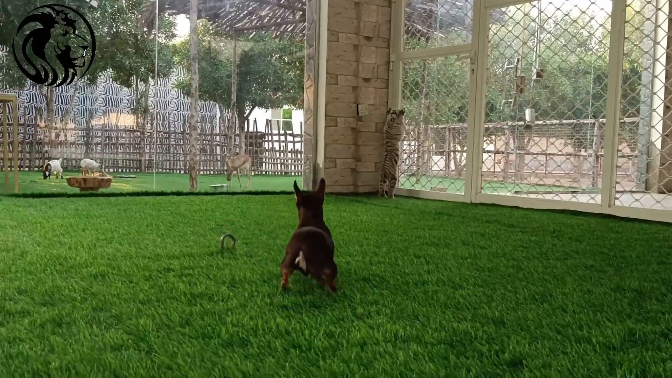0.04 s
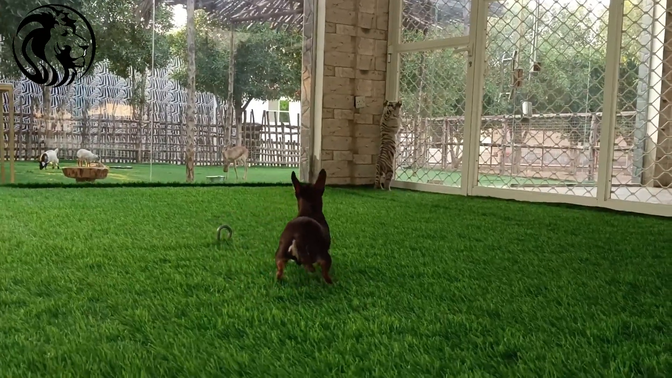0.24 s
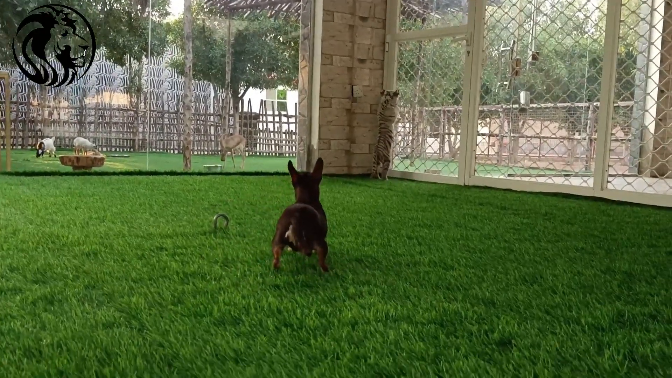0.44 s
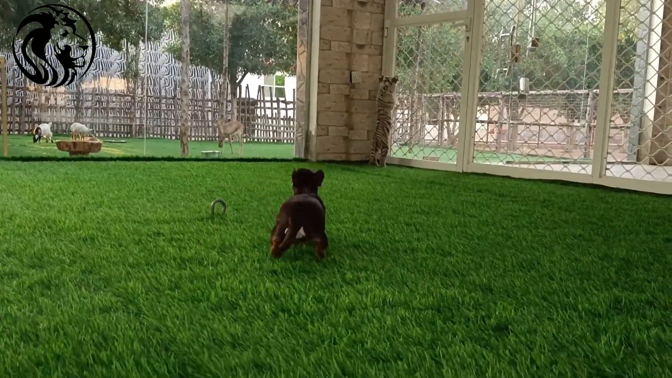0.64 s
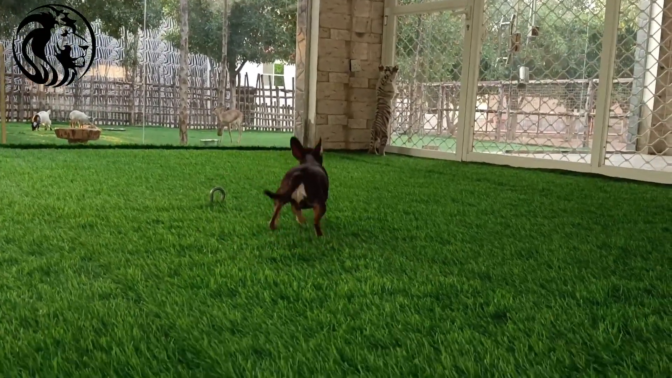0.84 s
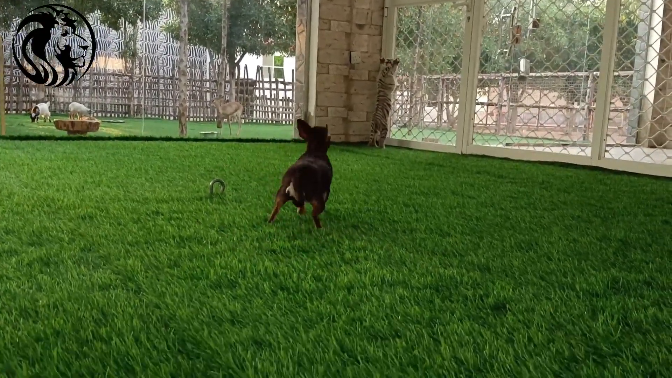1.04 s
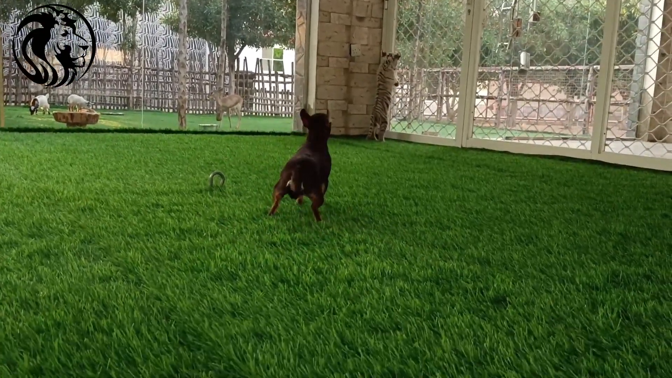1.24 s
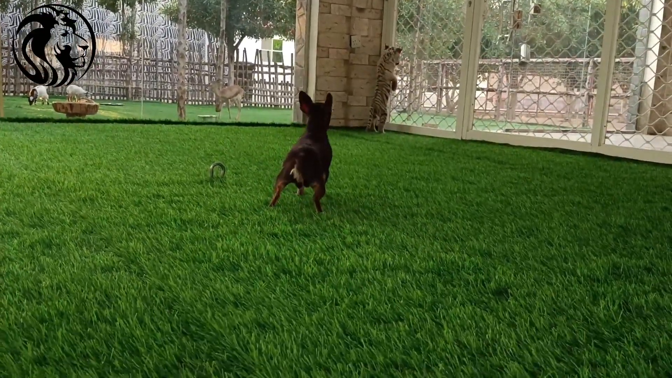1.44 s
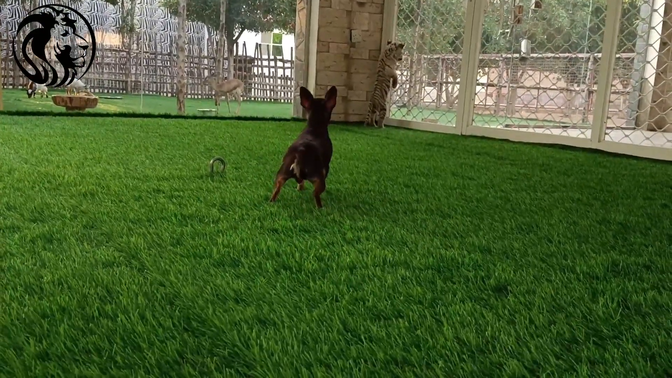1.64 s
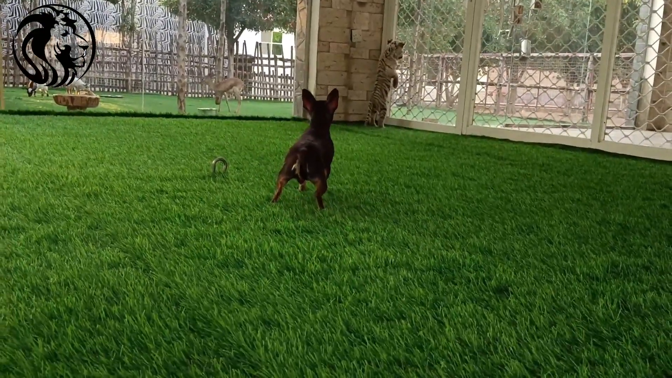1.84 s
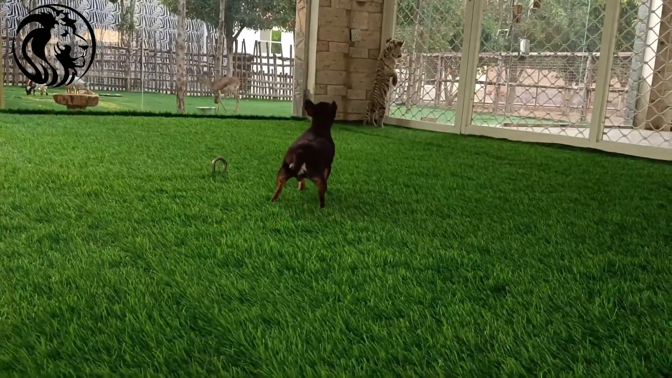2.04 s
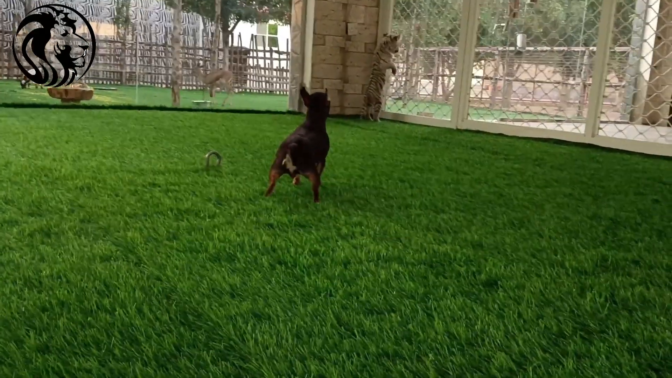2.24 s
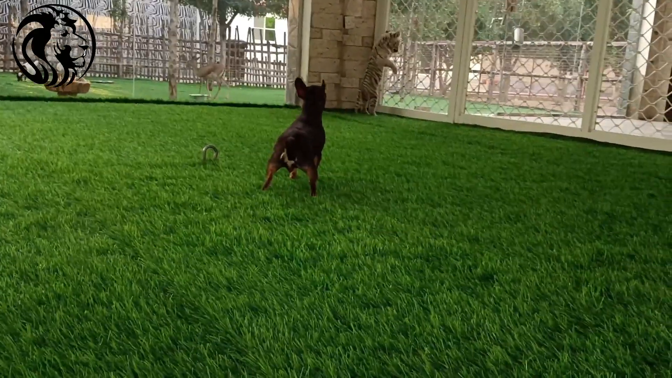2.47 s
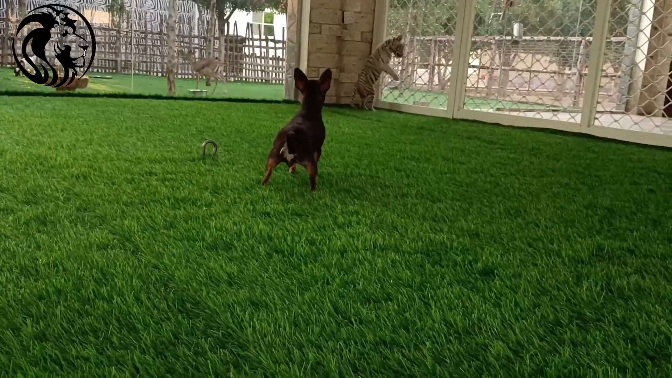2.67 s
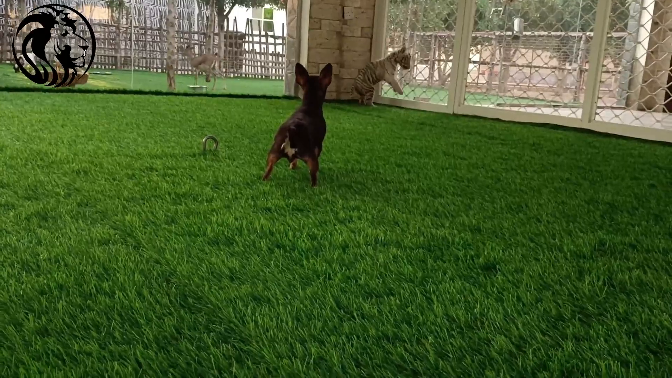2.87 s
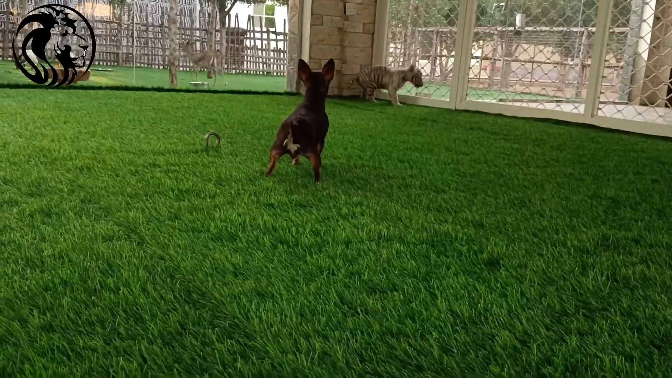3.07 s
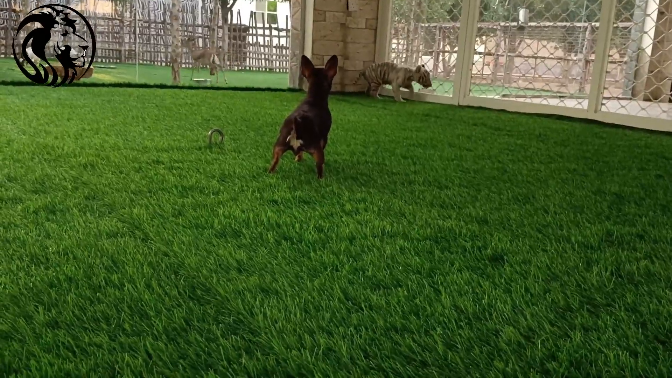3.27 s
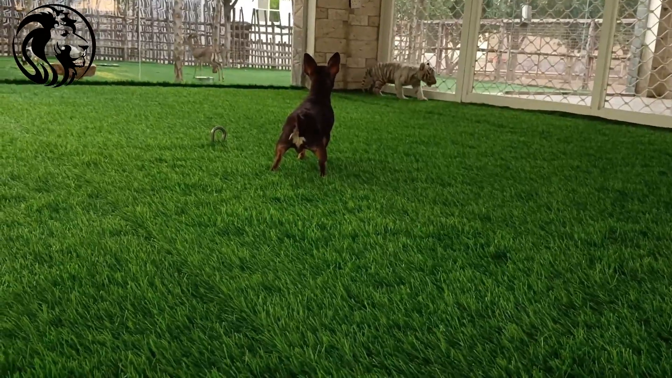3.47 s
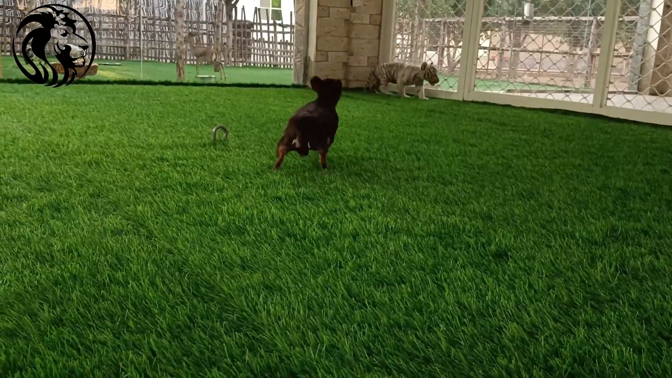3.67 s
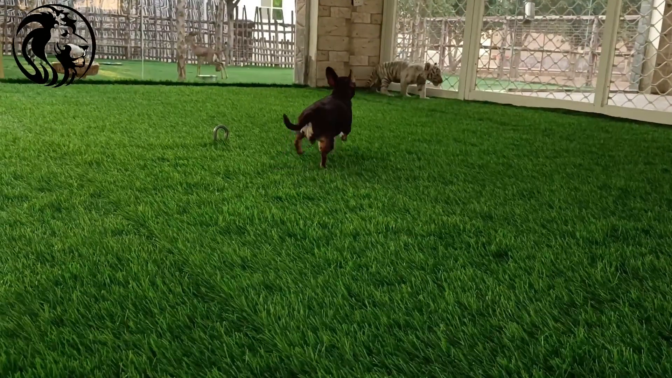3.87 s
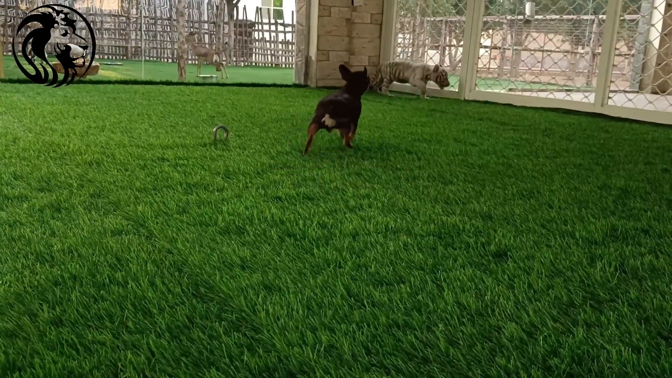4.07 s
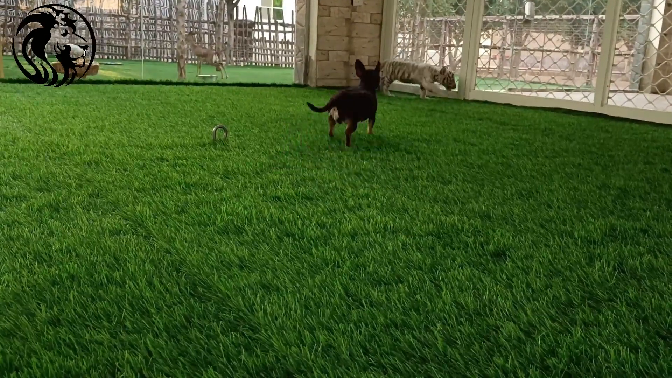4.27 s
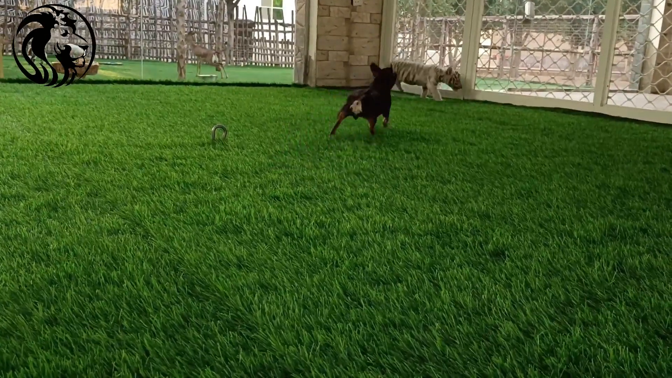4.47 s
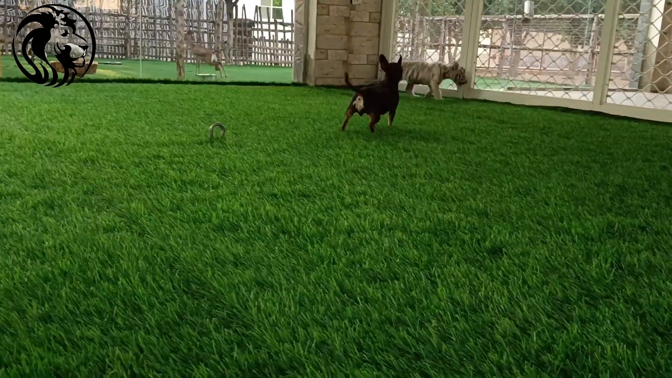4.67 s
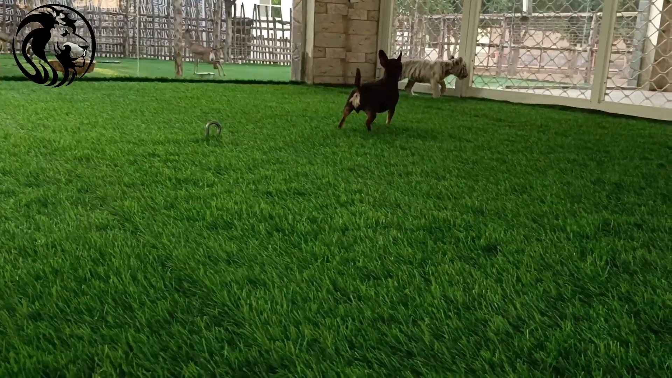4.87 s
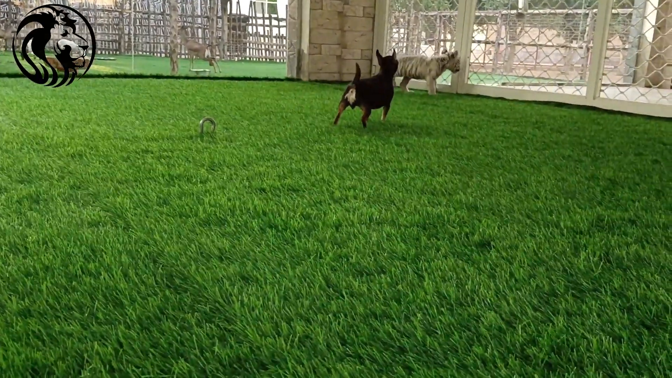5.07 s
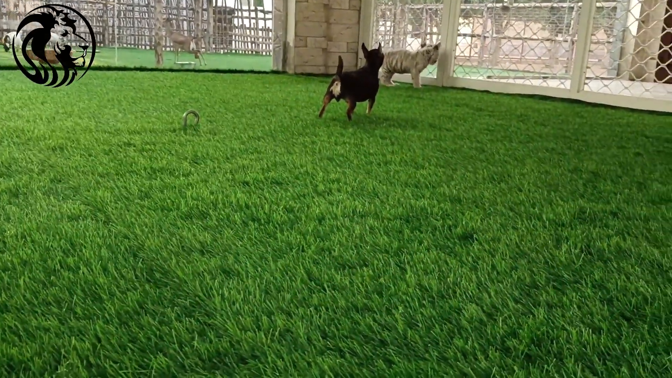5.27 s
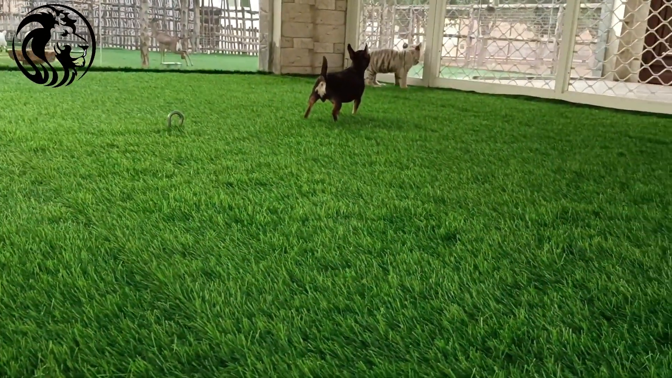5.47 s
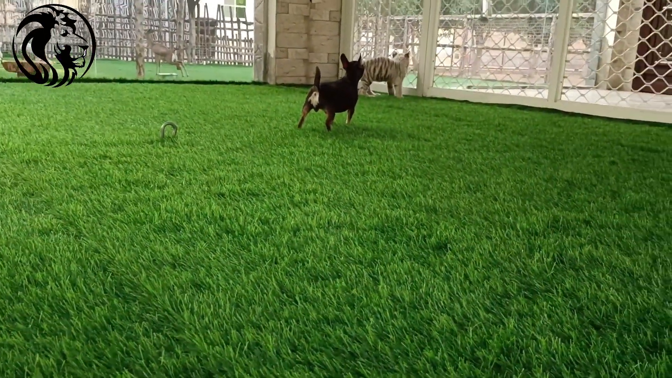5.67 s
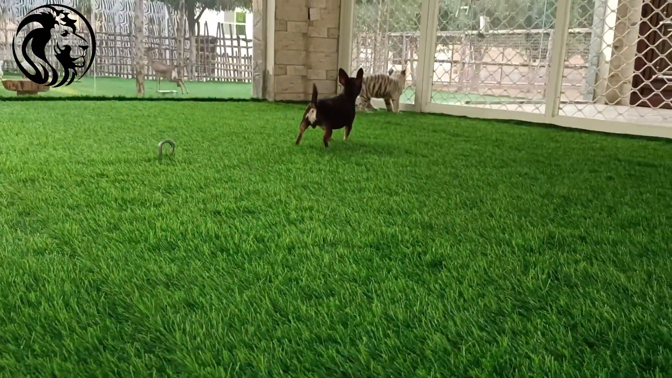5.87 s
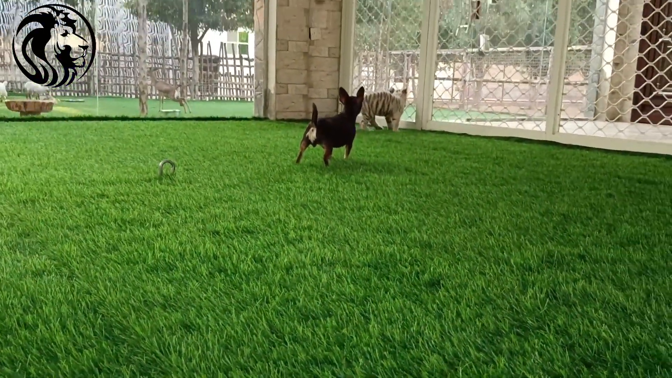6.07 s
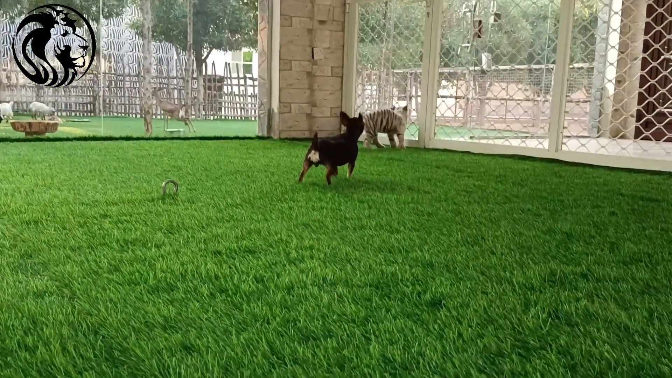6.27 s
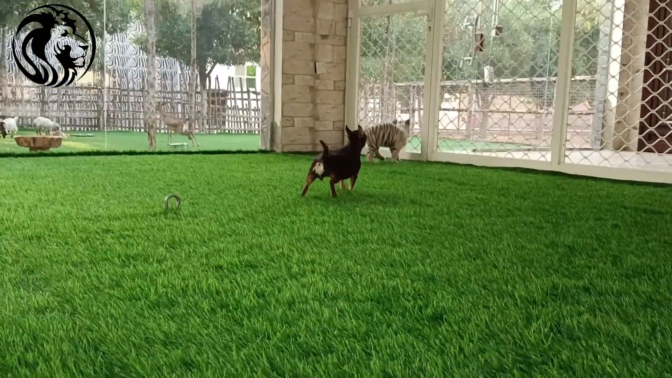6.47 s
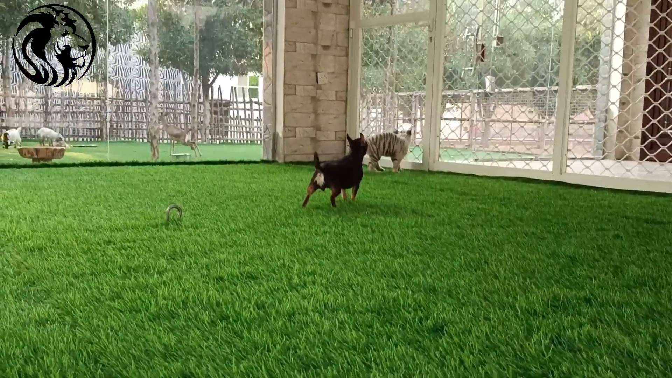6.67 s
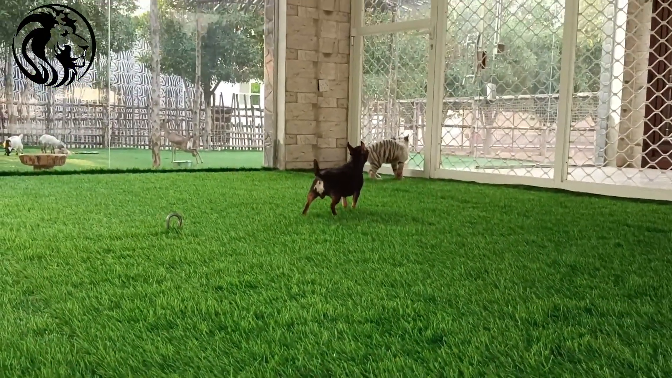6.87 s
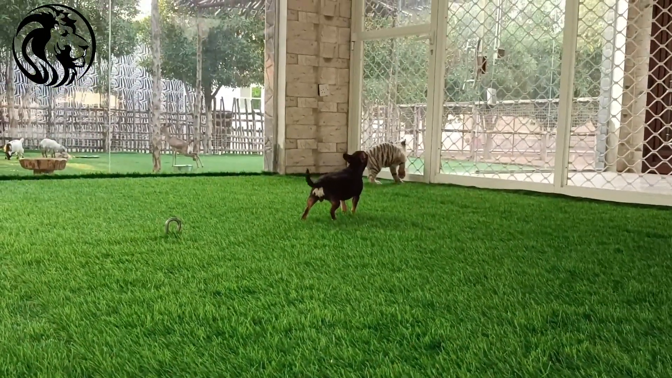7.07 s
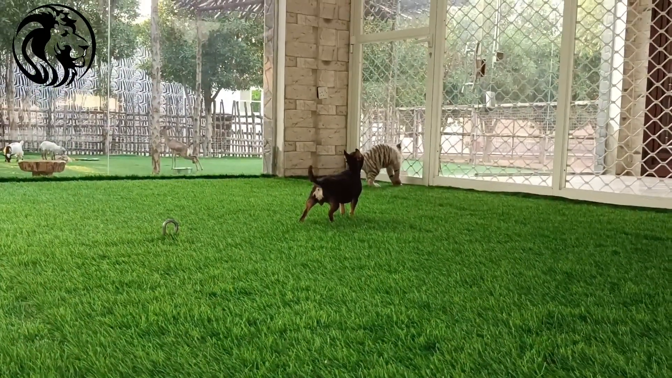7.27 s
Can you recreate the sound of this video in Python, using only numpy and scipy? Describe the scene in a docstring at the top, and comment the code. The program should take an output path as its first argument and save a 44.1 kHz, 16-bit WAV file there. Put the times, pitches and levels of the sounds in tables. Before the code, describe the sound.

Stereo pickup inside a large hard-walled enclosure with artificial grass. Ventilation rumbles softly, louder in the first second, with a faint low hum. Two light paw rustles come first, then loud, clipped, high puppy yaps in irregular groups with pauses, their echoes hanging in the room. A breathy low growl precedes the third yap. Thin distant chirps pass almost unnoticed, and a small flurry of turf scuffs comes before the last two yaps.

```python
"""A small puppy yaps eight times at a tiger cub, in a glass-walled hall laid with artificial turf, heard by a stereo pair.
Each yap is a low grunt from the chest and vocal-fold pulses with air, shaped by three throat resonances;
the tone opens as the jaw does, brightens with strain, then sags and roughens, and the hall rings for about a second.
Nearby, a soft growl and paws scuffing the turf (shaped noise); far off, thin chirps (falling sine tones).
Behind it all, ventilation: rumble and hiss of shaped noise, louder at first, and a hum of two wavering tones."""
import sys
import numpy as np
from scipy import signal
from scipy.fft import rfft, irfft, next_fast_len
from scipy.io import wavfile
from scipy.ndimage import uniform_filter1d, minimum_filter1d, map_coordinates

SR = 44100
rng = np.random.default_rng(int(sys.argv[2]) if len(sys.argv) > 2 else 0)


def dump(signal):
    """Clip the signal to [-1, 1] and save it as 16-bit WAV at the path in sys.argv[1]."""
    limited = np.clip(np.atleast_2d(signal).T, -1, 1)
    pcm = np.round(limited * 32767).astype(np.int16)
    wavfile.write(sys.argv[1], SR, pcm)


N = 322812
T = np.arange(N) / SR

# Ventilation rumble, also the colour of a paw's thud: [f/Hz, relative level per Hz/dB]
RUMBLE_SPECTRUM = [(12, -61), (20, -25), (46, -11), (88, -2), (107, 0), (172, -4.5), (198, 0.5),
                   (225, -5.5), (349, -18), (386, -22.5), (600, -32.5), (780, -58.5), (1320, -120)]
# Ventilation hiss: [f/Hz, relative level per Hz/dB]
HISS_SPECTRUM = [(200, -13.5), (400, -13), (700, -5), (1200, -10.5), (1900, -11), (3400, -11.5),
                 (4400, -23.5), (7000, -29.5), (10000, -35), (15000, -30)]
# Ventilation motor tones: [f/Hz, rms level before the microphones/dB]
HUM_TONES = [(99, -59.5), (200, -66.5)]
# Far-off chirps: [start t/s, length t/s, start f/Hz, end f/Hz, relative level before the hall/dB]
CHIRPS = [(2.891, .05, 4840, 4120, -74), (2.943, 0.16, 3110, 3031, -72), (5.576, 0.13, 4760, 3120, -77.5)]
# Paw steps: [t/s, relative level/dB, f/Hz towards which the rustle is shifted]
STEPS = [(0.1244, -54.5, 2130), (0.1883, -52, 1760), (2.9481, -60.5, 2920), (3.5198, -63, 3310),
         (3.5794, -59, 2365), (5.7276, -53, 3250), (5.8182, -45.5, 2310), (5.9795, -42, 3075),
         (6.24, -49.5, 2610)]
# Rustle of the plastic blades: [f/Hz, relative level per Hz/dB]
TURF_SPECTRUM = [(200, -35.5), (500, -19), (1100, -6.5), (1600, -9.5), (2400, 0), (3300, -5), (4200, -24),
                 (5600, -28), (9000, -44.5), (15000, -52.5)]
# Closed-mouth colour of the growl: [f/Hz, relative level/dB]
GROWL_COLOUR = [(60, -44), (130, -18.5), (205, 4), (320, -7.5), (420, -17), (600, -3), (900, -17.5),
                (1500, -28.5), (5000, -93.5)]
# Chest colour of the grunt under each yap: [f/Hz, relative level/dB]
CHEST_COLOUR = [(30, -54), (110, -21.5), (175, -11), (290, 5.5), (400, -4), (550, -2.5), (850, -3.5),
                (1300, -22), (2500, -53), (6000, -87)]
# Colour of the hissy voice between the teeth: [f/Hz, relative level/dB]
MUZZLE_COLOUR = [(500, -75), (1200, -7.5), (2000, -9.5), (2300, 1.5), (2600, -2.5), (3200, 0.5),
                 (3550, -9.5), (4200, -31.5), (5700, -21), (6500, -37), (7200, -35), (8600, -46.5),
                 (11500, -47.5), (13500, -31), (15500, -33.5)]
# Yaps: [start t/s, mouth opening t/s, rms level over the first 0.2 s before the microphones/dB, nominal pitch f/Hz,
# droop of the jaw/0-1, second resonance at full strain f/Hz, its relative level/dB, third resonance f/Hz,
# its relative level/dB, relative grunt level/dB, right minus left level before the microphones/dB]
YAPS = [ (.768, .022, -10.5, 526.8, .5, 1700, 1.5, 2844, -5, -15, -0.5),
        (1.171, .038, -13, 475.1, .7, 1565, -0.5, 3186, -8, -18.5, -0.5),
        (2.049, .046, -12.5, 481.7, .9, 1603, -1, 2680, -10.5, -18, 0),
        (3.745, .036, -12.5, 498.6, 0.4, 1726, 1.5, 3014, -4.5, -15.5, 0),
        (4.072, .046, -14.5, 479.5, .9, 1585, 1.5, 3105, -7, -15, -0.5),
        (4.458, .050, -13.5, 486, .85, 1551, -4, 2947, -12, -19.5, -0.5),
        (6.400, .040, -11.5, 513.7, .35, 1667, 0, 2906, -4, -17.5, -1),
        (7.123, .044, -14.5, 484, 0.4, 1583, 2, 2974, -4.5, -17.5, 0.5)]
# Ring of the hall: [f/Hz, t60/s]
HALL_RING = [(150, 1.5), (400, 1.435), (1000, 0.87), (2800, 0.94), (6000, .8), (9000, 1.1), (14000, 0.32)]
# Imbalance of the stereo pair: [f/Hz, level by which the right microphone is louder/dB]
MIC_BALANCE = [(100, 1), (400, 1), (900, 2), (1500, 4), (2800, 7.5), (5500, 3.5), (8000, 3.5), (13000, 7.5)]

RUMBLE_DB, HISS_DB = -57.5, -72.5  # settled background
EARLY_RUMBLE_DB, EARLY_HISS_DB, SETTLE_S = 9, 11, 1.1  # extra level at first, and how soon it settles
TURF_HZ = 2430  # centre of the turf's spectrum
GROWL_S, GROWL_LENGTH_S = 1.75, .3
YAP_S, RELEASE_DB_PER_S = .125, 1401.5  # each yap is one push of the chest, cut off this fast
ONSET_DB, SAG_DB = 35, 7  # the voice swells by this while the mouth opens, then sags as the air runs out
GRUNT_ONSET_DB, GRUNT_SAG_DB = 6, 10  # the same for the grunt, which is there almost at once
PITCH_RISE, PITCH_ARCH = 1.03, .34  # ratio to nominal pitch, jaw wide; share lost with the jaw shut
FIRST_RATIO, FIRST_ARCH = 2.198, .34  # the same for the first resonance, near the second harmonic
STRAIN_S, STRAIN_DB, SLACK_DB = .088, 1.5, -22  # time to full strain; gain of upper resonances, full and none
SECOND_GLIDE, SECOND_DROOP = .34, .07  # shares the second resonance loses: throat slack, jaw drooping
ROUGH, ROUGH_ONSET, ROUGH_END = 0.34, 3.6, 0.75  # share of air at the cleanest; added at start and at end
AIR_SAG_DB = 3.5  # the hiss between the teeth weakens by this much more than the voice
TOP_HZ = 15600  # band limit of the microphones' signal


def amp(db):
    """Decibels to gain."""
    return 10 ** (np.asarray(db) / 20)


def unit(x):
    """Scale to rms 1."""
    return x / np.sqrt(np.mean(x ** 2) + 1e-20)


def along(points, hz):
    """Read (f/Hz, value) points on a log frequency axis."""
    f, v = np.transpose(points)
    return np.interp(np.log(hz + 1), np.log(f), v)


def filtered(x, response):
    """Multiply the spectrum of x by a response of frequency."""
    n = x.shape[-1]
    m = next_fast_len(n + 8192)
    return irfft(rfft(x, m) * response(np.fft.rfftfreq(m, 1 / SR)), m)[..., :n]


def coloured(x, spectrum):
    """Shape x by a (f/Hz, level/dB) spectrum, at rms 1."""
    return unit(filtered(x, lambda hz: amp(along(spectrum, hz))))


def wobble(rate, n):
    """A smooth random curve of n samples, with rate knots a second."""
    knots = rng.standard_normal(int(n * rate / SR) + 4)
    at = np.arange(0, len(knots) - 1, 1 / 8)
    return np.interp(np.arange(n) * rate / SR, at, map_coordinates(knots, [at]))


def add(track, s, sound):
    """Mix a sound into the track at time s."""
    part = track[..., max(round(s * SR), 0):][..., :sound.shape[-1]]
    part += sound[..., :part.shape[-1]]


def diffuse(n, spacing_m=0.12):
    """Noise from all sides at two spaced microphones: alike in the bass, unrelated in the treble."""
    def rotation(hz):
        alike = 0.97 * np.sinc(2 * hz * spacing_m / 343)  # 343 m/s: speed of sound
        angle = np.arccos(np.clip(alike, -1, 1)) / 2
        return np.array([np.cos(angle), np.sin(angle)])

    mid, side = filtered(rng.standard_normal((2, n)), rotation)
    return np.array([mid + side, mid - side])


def ventilation(swell_db=-2.4, drift_rad=0.23):
    """Low rumble and faint hiss from all around, louder at first, and a slightly unsteady motor hum."""
    early = np.exp(-(T / SETTLE_S) ** 2)
    rumble_db = RUMBLE_DB + EARLY_RUMBLE_DB * early + swell_db * wobble(3.9, N)
    rumble = amp(rumble_db) * coloured(diffuse(N), RUMBLE_SPECTRUM)
    hiss = amp(HISS_DB + EARLY_HISS_DB * early) * coloured(diffuse(N), HISS_SPECTRUM)
    hum = np.zeros(N)
    for hz, db in HUM_TONES:
        phase = 2 * np.pi * hz * T + drift_rad * wobble(4, N)
        hum += amp(db) * unit(np.sin(phase))
    return rumble + hiss + hum


def hall(x, direct_db, early_db, early_t60, build_s=0.0074, lag_s=.00007, shadow_hz=1600):
    """Direct sound, dulled by the head facing away; a burst from the near panes; the long ring of the hall."""
    t = np.arange(SR) / SR
    field = diffuse(SR)
    hz, when, bands = signal.stft(field, SR, nperseg=256)
    decay = amp(-60 * when / along(HALL_RING, hz)[:, None])
    tail = signal.istft(bands * decay, SR, nperseg=256)[1][:, :SR]
    tail *= 1 - np.exp(-t / build_s)
    panes = field[:, ::-1] * amp(-60 * t / early_t60)  # reversed, so unlike the tail
    echo = tail / np.linalg.norm(tail[0]) + amp(early_db) * panes / np.linalg.norm(panes[0])
    direct = np.exp(-2 * np.pi * shadow_hz * t)
    for microphone, s in zip(echo, (0, lag_s)):  # the left one hears it first
        add(microphone, s, amp(direct_db) * direct / direct.sum())
    return signal.fftconvolve(x[None], echo, axes=1)


def chirps(waver=0.049, flutter_db=4):
    """Thin, faint, broken whistles: sine tones that fall in pitch, wavering in pitch and level."""
    track = np.zeros(N)
    for s, length, start_hz, end_hz, db in CHIRPS:
        n = int(length * SR)
        hz = np.geomspace(start_hz, end_hz, n) * (1 + waver * wobble(260, n))
        level = amp(db + flutter_db * wobble(60, n)) * signal.windows.tukey(n)
        add(track, s, level * np.sin(2 * np.pi * np.cumsum(hz) / SR))
    return track


def paws(gain_db=-13, rise_s=0.004, t60=0.17, brush_db=-5, brush_t60=0.6, grain_db=5, thud_db=-2, shift=.5):
    """Each step thuds softly and crushes a patch of plastic blades, which brush on as they spring back."""
    track, n = np.zeros(N), SR // 2
    t = np.arange(n) / SR
    crush = amp(-60 * t / t60)
    brush = amp(brush_db - 60 * t / brush_t60)
    pressure = (crush + brush) * (1 - np.exp(-t / rise_s))
    for s, db, centre_hz in STEPS:
        stretch = (centre_hz / TURF_HZ) ** shift  # part of the way to the step's own centre
        spectrum = np.multiply(TURF_SPECTRUM, [stretch, 1])
        grains = rng.standard_normal(n) * amp(grain_db * wobble(640, n))
        blades = coloured(grains, spectrum)
        thud = amp(thud_db) * coloured(rng.standard_normal(n), RUMBLE_SPECTRUM)
        add(track, s - rise_s, amp(db + gain_db) * pressure * (blades + thud))
    return track


def folds(pitch_hz, rough, jitter=0.015, flutter_db=3, count=14):
    """Unsteady vocal-fold overtones, mixed with air that is let through once a cycle."""
    n = len(pitch_hz)
    phase = 2 * np.pi * np.cumsum(pitch_hz * (1 + jitter * wobble(260, n))) / SR
    # so small a mouth radiates no fundamental
    pulses = unit(sum(np.cos(k * phase) for k in range(2, count + 2)))
    air = unit(rng.standard_normal(n) * (1 + 0.47 * np.cos(phase)))
    air *= np.sqrt(SR / 2 / (count * np.mean(pitch_hz)))  # same power per Hz as the pulses
    rough = np.clip(rough, 0, 1)
    mix = np.sqrt(1 - rough) * pulses + np.sqrt(rough) * air
    return mix * amp(flutter_db * wobble(190, n))


def growl(dry_db=-53, pitch_hz=102):
    """A soft closed-mouth growl before the third yap: low, very breathy vocal folds."""
    track, n = np.zeros(N), int(GROWL_LENGTH_S * SR)
    voice = coloured(folds(np.full(n, pitch_hz), 0.83), GROWL_COLOUR)
    add(track, GROWL_S, amp(dry_db) * signal.windows.tukey(n) * voice)
    return track


def resonance(x, hz, width_hz, top_hz=3550):
    """A steep-sided throat resonance centred on the curve hz; soft tissue absorbs what lies above top_hz."""
    carrier = np.exp(2j * np.pi * np.cumsum(hz) / SR)
    pole = np.exp(-np.pi * width_hz / SR)
    # shift the centre to zero, ring there, and shift back
    ring = (signal.lfilter([1], np.poly([pole, pole]), x / carrier) * carrier).real
    return unit(signal.sosfilt(signal.butter(10, top_hz, fs=SR, output="sos"), ring))


def yap(opening, pitch_hz, droop, second_hz, second_db, third_hz, third_db, grunt_db):
    """One yap: the jaw arches pitch and first resonance, strain brightens it, spent air makes it hoarse."""
    t = np.arange(SR // 4) / SR
    shut = np.clip(1 - t / opening, 0, 1)  # 1 at the start, 0 once the mouth is open
    spent = np.clip((t - opening) / (YAP_S - opening), 0, 1.25)  # share of the air used since then
    release_db = -RELEASE_DB_PER_S * np.maximum(t - YAP_S, 0)
    push_db = release_db - ONSET_DB * shut ** 1.5 - SAG_DB * spent
    chest_db = release_db - GRUNT_ONSET_DB * shut ** 2 - GRUNT_SAG_DB * spent
    jaw = shut ** 1.6 + droop * spent ** 2  # 0 = wide open
    strain = np.minimum(t / STRAIN_S, 1)
    strain_db = SLACK_DB + (STRAIN_DB - SLACK_DB) * strain

    voice_hz = pitch_hz * PITCH_RISE * (1 - PITCH_ARCH * jaw)
    first_hz = pitch_hz * FIRST_RATIO * (1 - FIRST_ARCH * jaw)
    slack_loss = SECOND_GLIDE * (1 - strain) ** 1.3
    droop_loss = SECOND_DROOP * droop * spent ** 2
    tongue_hz = second_hz * (1 - slack_loss - droop_loss)

    # the tone is cleanest just as the mouth opens, then breaks up
    hoarse = ROUGH + ROUGH_ONSET * shut ** 2 + ROUGH_END * spent ** 2
    voice = folds(voice_hz, hoarse, jitter=0.025, flutter_db=2)
    rasp = folds(tongue_hz / 3, hoarse + 0.058, jitter=.02, flutter_db=2)  # the folds slip out of step
    fade_db = -3.5 * spent ** 2  # the first resonance yields to the upper ones
    first = amp(fade_db) * resonance(voice, first_hz, width_hz=340)
    second = amp(second_db - 1) * resonance(rasp, tongue_hz, width_hz=510)
    third = amp(third_db - 4) * resonance(rasp, np.full(len(t), third_hz), width_hz=330)

    # turbulence between the teeth, at its cap before strain is full
    air = amp(third_db - 2) * coloured(folds(voice_hz, 0.44), MUZZLE_COLOUR)
    air *= amp(np.minimum(strain_db + 6, 1.5) - AIR_SAG_DB * spent)
    mouth = amp(push_db) * (first + amp(strain_db) * (second + third) + air)
    mouth = signal.sosfilt(signal.butter(6, 680, "high", fs=SR, output="sos"), mouth)
    low_folds = folds(voice_hz / 4, 0.6, flutter_db=4, count=20)
    grunt = amp(grunt_db - 3 + chest_db) * coloured(low_folds, CHEST_COLOUR)
    return (mouth + grunt) * np.clip(t / 0.0019, 0, 1)


def barking():
    """The eight yaps, each ringing on in the hall with a freshly drawn random echo."""
    track = np.zeros((2, N))
    for s, opening, db, *throat, pan_db in YAPS:
        sound = hall(yap(opening, *throat), direct_db=1, early_db=3, early_t60=0.09)
        loudness = np.std(sound[:, :SR // 5], axis=1, keepdims=True)
        balance = amp([[-pan_db / 2], [pan_db / 2]])
        add(track, s, sound / loudness * amp(db) * balance)
    return track


def scene():
    """Everything that sounds in the hall; the chirps are far off and arrive mostly as echo."""
    far = hall(chirps(), direct_db=-6, early_db=0, early_t60=.15)
    near = hall(growl() + paws(), direct_db=6.5, early_db=-1.5, early_t60=.15)
    return ventilation() + (far + near)[:, :N] + barking()


def record(dry):
    """The right microphone hears more treble; a limiter turns peaks down to full scale, then a band limit."""
    sides = np.array([[-1], [1]]) / 2
    heard = filtered(dry, lambda hz: amp(along(MIC_BALANCE, hz) * sides))
    needed = 1 / np.maximum(np.abs(heard).max(axis=0), 1)
    gain = uniform_filter1d(minimum_filter1d(needed, size=400), size=400)
    return filtered(heard * gain, lambda hz: hz < TOP_HZ)


dry = scene()
out = record(dry)
dump(out)
```